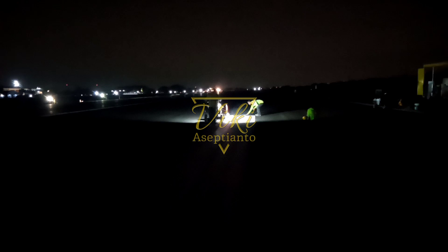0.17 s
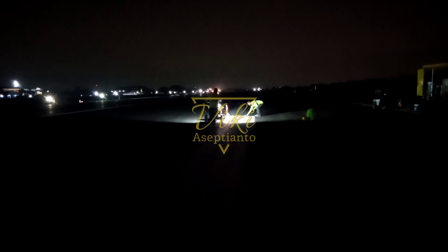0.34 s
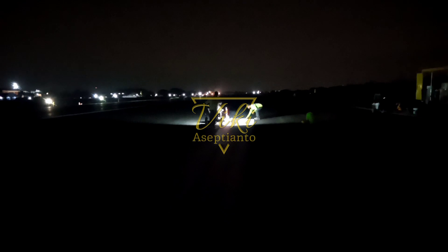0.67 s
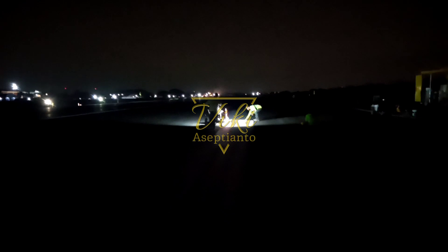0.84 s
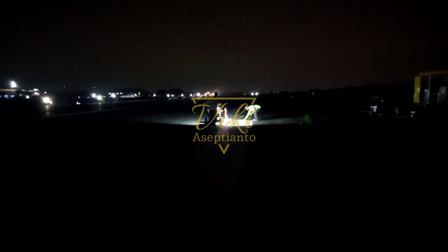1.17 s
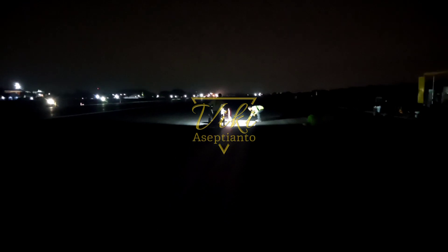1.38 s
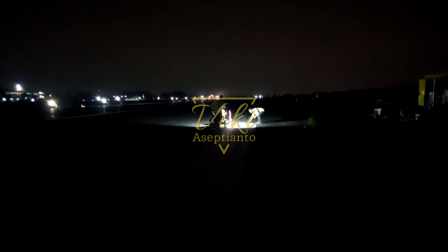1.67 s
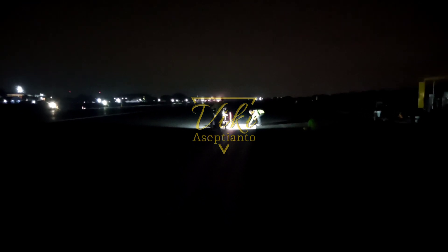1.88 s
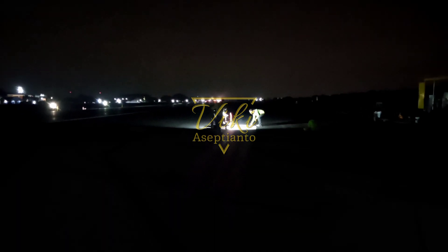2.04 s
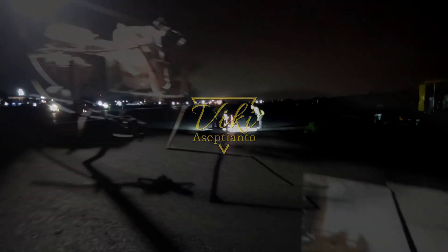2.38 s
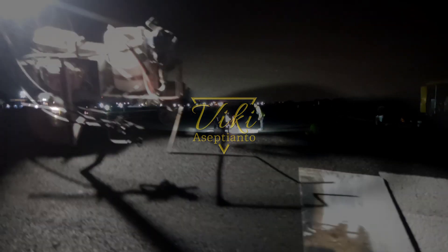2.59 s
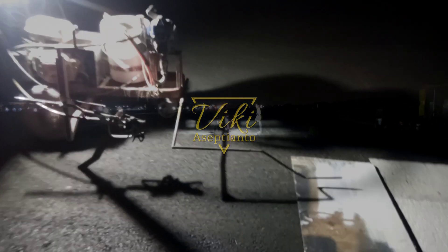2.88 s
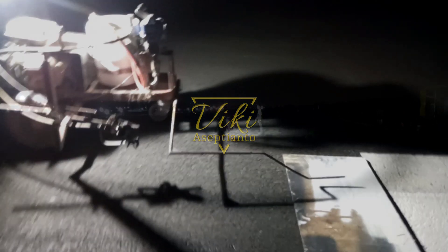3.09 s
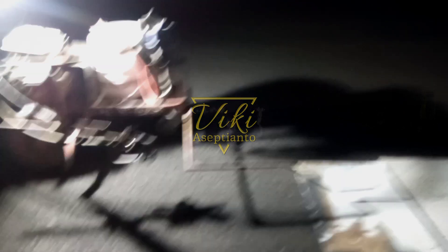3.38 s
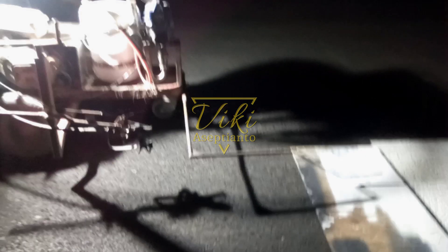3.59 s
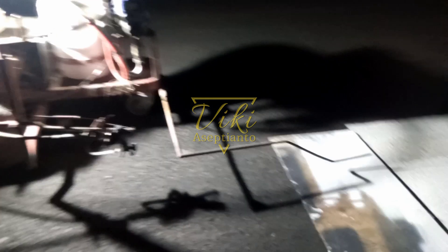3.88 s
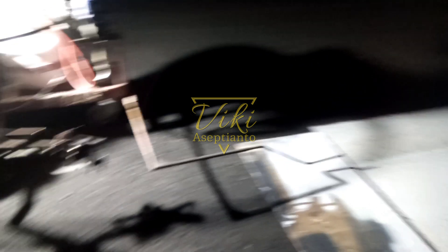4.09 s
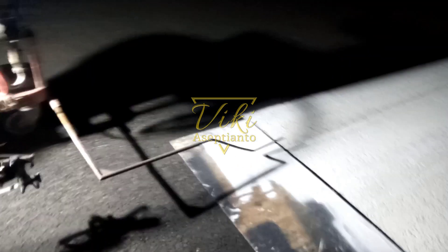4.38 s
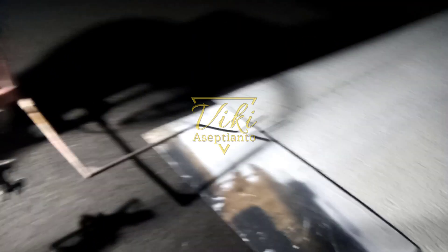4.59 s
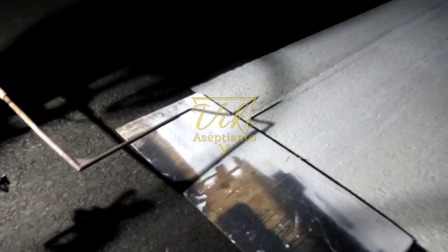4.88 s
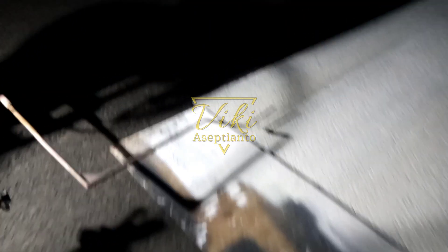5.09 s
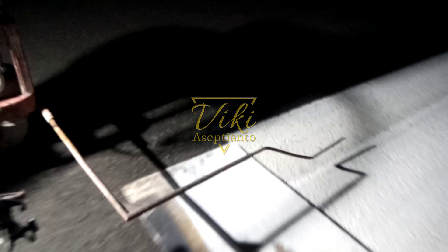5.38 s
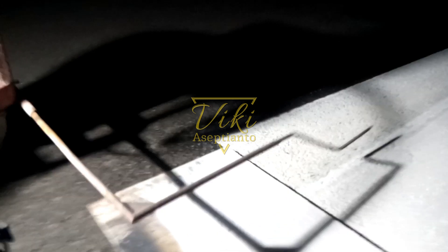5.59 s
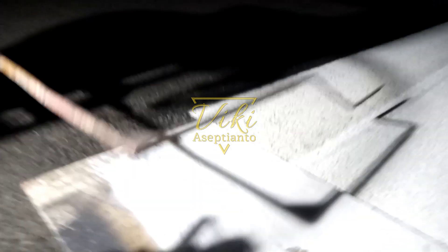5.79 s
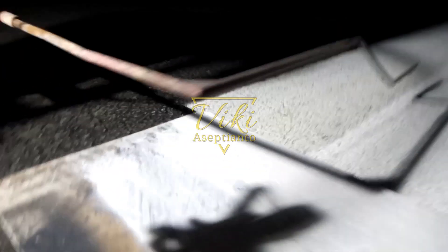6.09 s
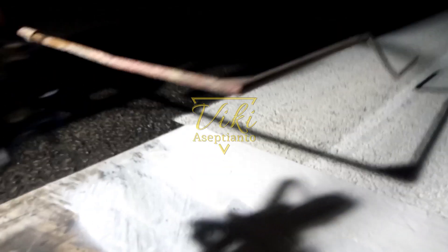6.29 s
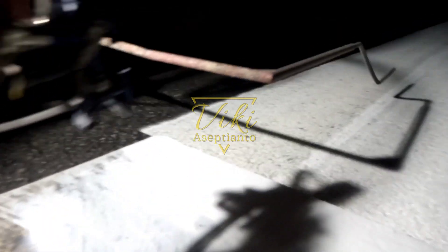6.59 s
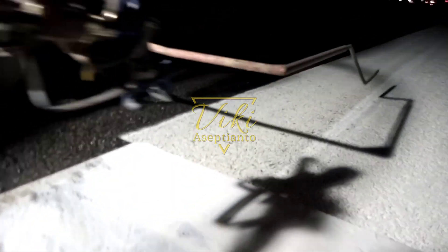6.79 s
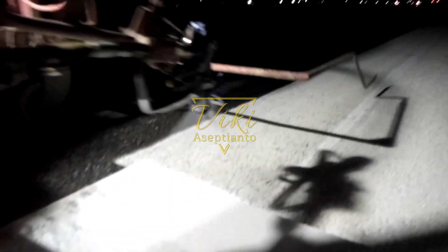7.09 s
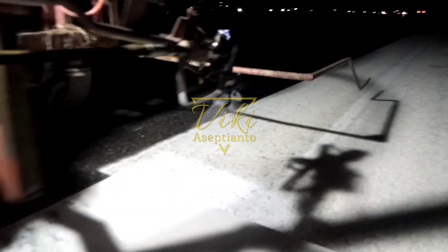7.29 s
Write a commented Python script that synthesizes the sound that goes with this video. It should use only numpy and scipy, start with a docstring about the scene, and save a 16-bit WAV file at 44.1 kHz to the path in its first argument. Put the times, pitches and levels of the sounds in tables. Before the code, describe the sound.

Outdoors on open pavement, a small petrol engine and chugging compressor putter faintly in the distance. At about two and a half seconds the sound crossfades to a close position: a dense buzzing drone, thudding exhaust, knocking casing and strong rush of spray air. Loose steel fittings chatter and ring in bright fits, with quick clacks and thin squeals around six seconds. The handheld microphone ends up right beside the machine.

```python
"""Open pavement: a wheeled road-marking sprayer at work, a distant scene fading into one beside it.
Its one-cylinder petrol engine thuds, hums and knocks as shaped impulses, and its compressor chugs.
Loose steel fittings on the frame chatter and ring in fits: resonances driven by dense tiny impacts.
Air, a very high hiss and the jet on the road are coloured noise, and the treble flutters steadily.
Close by, the asphalt mirrors engine and spray."""
import sys
import numpy as np
from scipy import signal
from scipy.fft import rfft, irfft
from scipy.io import wavfile
from scipy.ndimage import uniform_filter1d, map_coordinates

SR = 44100
rng = np.random.default_rng(int(sys.argv[2]) if len(sys.argv) > 2 else 0)


def unload_audio(sound):
    """Save the sound as a 16-bit wav file, at the path given as the first command line argument."""
    columns = np.transpose(np.atleast_2d(sound))
    # keep every value between -1 and 1, then stretch to whole-number steps
    steps = np.round(np.clip(columns, -1, 1) * 32767)
    wavfile.write(sys.argv[1], SR, steps.astype(np.int16))


N = 328545

# the distant scene fades out while a close scene fades in: time_s, closeness (0-1), far_db, near_db
LISTENER = [(2.05, 0.01, 4.5, -44), (2.3, 0.04, -1, -32), (2.58, 0.02, -3, -25), (2.95, 0.51, -2, -17),
            (3.35, 0.83, -9, -10.5), (3.95, 0.53, -40, -5), (4.16, 0.55, -42, -1)]
# swells and lulls of the engine and the spray: middle_s, half_length_s, change_db, part
SWELLS = [(.06, 0.18, 3, "knock"), (.85, 0.24, -7.5, "knock"), (1.3, 0.32, -2, "air"),
          (1.5, 0.98, 5.5, "mist"), (2.78, 0.13, -1, "air"), (3.12, .12, -2, "air"),
          (4.16, 0.42, 3, "knock"), (4.17, 0.17, 1, "cover"), (4.47, 0.052, 0, "exhaust"),
          (5.57, 0.12, 2, "knock"), (5.75, 0.26, 3.5, "knock"), (5.85, 0.15, -13, "cover"),
          (6.42, 0.054, 3, "exhaust"), (6.77, 0.039, -5.5, "air"), (5.05, 0.74, 11.5, "tailpipe"),
          (5.75, .25, -11, "tailpipe"), (6.55, 0.71, 7, "tailpipe"), (6.6, 0.32, 0, "drone"),
          (7.2, 0.75, -23, "cover"), (7.28, 0.36, 6.5, "knock"), (7.38, 0.16, 10.5, "exhaust"),
          (7.38, 0.15, -2.5, "drone")]


def undb(db):
    """Decibels to gain."""
    return 10 ** (np.asarray(db) / 20)


def curves(table):
    """The columns of a table, joined by straight lines in time and held outside it."""
    s, *columns = np.transpose(table)
    return [np.interp(np.arange(N) / SR, s, c) for c in columns]


def unit(x):
    """Scale to rms 1."""
    return x / np.sqrt(np.mean(x ** 2) + 1e-18)


def noise():
    """White noise."""
    return rng.standard_normal(N)


def wander(rate, count=1024):
    """Drift in straight lines between bounded random points, rate of them a second, at rms 1."""
    points = rng.standard_normal(count)
    path = map_coordinates(points, [np.arange(N) / SR * rate], order=1, mode="mirror")
    return unit(np.tanh(path))


def colour(x, points, size=4096):
    """Minimum-phase filter with the given (Hz, dB) outline, falling steeply outside it."""
    hz, db = np.transpose(points)
    octave = np.log2(np.maximum(np.fft.rfftfreq(size, 1 / SR), 1))
    known = np.log2(hz)
    outside = np.abs(octave - np.clip(octave, known[0], known[-1]))
    # 40 dB an octave beyond the outline, for two octaves
    gain = undb(np.interp(octave, known, db) - 40 * np.minimum(outside, 2))
    # folding the cepstrum forward makes the filter causal
    cepstrum = irfft(np.log(gain))
    cepstrum[1:size // 2] *= 2
    cepstrum[size // 2 + 1:] = 0
    impulse_response = irfft(np.exp(rfft(cepstrum)))
    return unit(signal.oaconvolve(x, impulse_response)[:N])


def ring(x, modes):
    """Drive (Hz, width Hz, dB) resonances, each filtered twice so the valleys between stay dark."""
    out = 0
    for hz, width, db in modes:
        section = np.concatenate(signal.iirpeak(hz, hz / (width * np.sqrt(2)), SR))
        out = out + undb(db) * signal.sosfilt([section, section], x)
    return unit(out)


def strokes(turns, jitter_s, scatter_db, weak_db, count=512):
    """One uneven impulse a turn; every second one is shifted by weak_db."""
    chance = rng.standard_normal((count, 2))
    at = np.flatnonzero(np.diff(np.floor(turns), prepend=-1) > 0)
    late, size = chance[:len(at)].T
    db = scatter_db * np.tanh(size) + weak_db * (np.arange(len(at)) % 2)
    place = np.clip(at + (jitter_s * SR * late).astype(int), 0, N - 1)
    return np.bincount(place, undb(db), N)


def puffs(impulses, decay_s, rise_s=0.00014):
    """The envelope of bursts that swell at each impulse and die away."""
    for s in (rise_s, decay_s):
        impulses = signal.lfilter([1], [1, -np.exp(-1 / (s * SR))], impulses)
    return unit(impulses)


def contacts(envelope, spread_db):
    """Dense tiny impacts of unequal size under an envelope."""
    size_db = spread_db * np.minimum(rng.exponential(size=N), 5)
    return unit(envelope * noise() * undb(size_db))


def crossfade(far, near, close):
    """Blend the distant and the close sound at equal power."""
    close = np.clip(close, 0, 1)
    return np.sqrt(1 - close) * far + np.sqrt(close) * near


def boost(table, part):
    """The gain of one part as each of its fits or swells rises and falls in a bell."""
    t, db = np.arange(N) / SR, np.zeros(N)
    for s, half_length, peak_db, name in table:
        if name == part:
            inside = np.abs(t - s) < half_length
            db[inside] += peak_db * np.cos(np.pi / 2 * (t[inside] - s) / half_length) ** 2
    return undb(db)


def heard(source, turn_db=0):
    """The gain of a source at the microphone: its distant and its close sound, added in power."""
    # by source, before the fades: far_db, near_db, steepness (of its fade-in in the close scene)
    levels = { "exhaust": (-48, -39.5, 0.8), "knock": (-47.5, -36.5, 0.62), "cover": (-82, -37.5, 1.67),
              "drone": (-70, -35.5, 1), "tailpipe": (-72, -54, 0.77), "air": (-47.5, -29, 1.11),
              "mist": (-60, -43, 1.3), "roar": (-95, -32, 1.33), "fittings": (-56, -33, 0.93),
              "plate": (-64.5, -49, 0.87), "tray": (-72, -47, 0.89), "bracket": (-67.5, -38.5, 0.96),
              "strut": (-61.5, -41.5, 1), "hook": (-62.5, -43, 1.5), "guard": (-56.5, -34.5, 1.46),
              "washer": (-66.5, -36.5, 0.91), "pin": (-64.5, -38, 0.96)}
    far_db, near_db, steepness = levels[source]
    _, fade_out_db, fade_in_db = curves(LISTENER)
    far = undb(far_db + fade_out_db)
    near = undb(near_db + steepness * fade_in_db + turn_db)
    return np.hypot(far, near)


def clacks(swell_s):
    """Loose steel slaps the frame: each is a brief crack or chink around the pitch of the spot struck."""
    # hard slaps: start_s, level_db, pitch_hz, filter_width_hz
    slaps = [(.457, -37, 5646, 4000), (.688, -36, 5270, 200), (2.958, -38, 9000, 1000),
             (3.040, -39.5, 8900, 1000), (3.128, -36, 7000, 3000), (3.146, -39, 7000, 3000),
             (3.735, -28, 5900, 2500), (3.848, -27, 7400, 3000), (4.765, -30, 7800, 900),
             (5.155, -28, 5600, 2370), (5.318, -27, 7400, 1200), (5.585, -23, 5650, 500),
             (5.635, -29, 5650, 300), (5.78, -28, 7000, 1200), (6.160, -25, 5550, 600),
             (6.211, -25, 5400, 600), (6.227, -22, 5400, 500), (6.285, -23, 5600, 900),
             (6.302, -20, 6000, 2400), (6.326, -20.5, 5960, 2400), (6.346, -21, 5700, 1200),
             (6.36, -21, 5670, 1000), (6.398, -24, 5650, 1200), (6.420, -23, 6300, 2400),
             (6.469, -27.5, 5400, 1200), (6.492, -32, 5400, 1200), (6.559, -26, 5700, 900),
             (6.589, -23, 7100, 900), (6.654, -22.5, 5900, 1500), (6.676, -26, 7500, 1200),
             (6.693, -25, 6000, 2400), (6.727, -33, 5600, 2400), (6.765, -21, 9000, 1400),
             (6.783, -27, 9150, 1400)]
    out = np.zeros(N)
    t = np.arange(SR // 20) / SR
    for s, db, hz, width_hz in slaps:
        section = np.concatenate(signal.iirpeak(hz, hz / width_hz, SR))
        crack = unit(signal.sosfilt([section, section], rng.standard_normal(len(t))))
        i = int(s * SR)
        out[i:i + len(t)] += undb(db) * t / swell_s * np.exp(1 - t / swell_s) * crack
    return out


def rattle(crank, flutter, close):
    """The fittings' chatter flutters at a steady rate; engine turns ring loose parts, which flutter too."""
    # fits in which a part shakes harder: middle_s, half_length_s, boost_db, part
    fits = [(.08, 0.36, 5, "plate"), (.35, 0.11, 10.5, "plate"), (2.24, 0.08, 7, "plate"),
            (.48, 0.033, 8, "guard"), (.46, 0.046, -2, "fittings"), (.61, 0.054, 2, "fittings"),
            (.74, 0.049, 12.5, "guard"), (.76, 0.12, 11, "washer"), (.99, 0.11, 4.5, "guard"),
            (1.46, 0.079, 6, "guard"), (1.96, 0.88, 4.5, "guard"), (1.99, 0.18, 12, "washer"),
            (2.96, 0.087, 3.5, "fittings"), (3.23, 0.15, 8.5, "pin"), (3.83, 0.043, 0.5, "fittings"),
            (3.87, 0.11, 6, "guard"), (4.13, 0.08, -1, "fittings"), (4.4, 0.51, 13, "washer"),
            (4.74, 0.082, 3, "fittings"), (4.88, 0.4, 9.5, "washer"), (4.93, 0.03, 6, "guard"),
            (5.15, 0.082, 5, "fittings"), (5.14, 0.1, 8, "washer"), (5.28, .16, 6, "washer"),
            (5.33, 0.21, 3, "fittings"), (5.48, .25, 7, "pin"), (5.99, 0.14, 1, "fittings"),
            (6.08, 0.68, 7.5, "bracket"), (5.98, 0.053, 7, "washer"), (6.1, 0.1, 8.5, "washer"),
            (6.17, 0.16, 4.5, "fittings"), (6.15, 0.24, 6.5, "guard"), (6.27, 0.16, 11, "pin"),
            (6.33, 0.051, 3, "fittings"), (6.53, 0.2, 8.5, "pin"), (6.58, 0.096, 14, "tray"),
            (6.65, 0.14, 12.5, "bracket"), (6.67, 0.13, 5.5, "fittings"), (6.89, 0.23, 9, "bracket"),
            (6.85, 0.12, 19, "tray"), (6.84, 0.062, 9.5, "pin"), (6.99, 0.21, 11, "pin"),
            (7.08, 0.25, 10.5, "washer"), (7.2, 0.36, 2, "guard"), (7.24, 0.34, 12.5, "tray"),
            (7.26, 0.27, 4.5, "fittings"), (7.39, 0.057, 8, "guard"), (.04, 0.078, 5.5, "strut"),
            (.99, .08, 8, "strut"), (1.17, 0.051, 7, "strut"), (1.97, 0.13, 6, "strut"),
            (2.76, 0.091, 6, "strut"), (6.86, .1, 8, "strut"), (7.14, .14, 8, "strut"),
            (.36, .2, 1, "hook"), (.72, 0.08, 7, "hook"), (1.37, 0.052, 3, "hook"),
            (5.985, 0.047, 18, "hook"), (6.08, .07, 12, "hook"), (6.17, 0.043, 14, "hook"),
            (1.27, 0.1, 6, "guard")]
    # colour of the steel chatter: pitch_hz, level_db
    steel = [(3500, -34), (4800, 4), (5600, -3), (6600, 6), (7500, 5.5), (8100, 2.5), (8800, 10.5),
             (9400, 4), (9950, 0.5), (10300, -14), (11500, -12), (13000, -39)]
    # modes of the many small fittings, then of each loose part: pitch_hz, width_hz, level_db
    fitting_modes = [(4380, 110, -9), (5540, 78, 9.5), (5730, 130, -8), (6270, 870, -1), (7200, 90, 5),
                     (8030, 54, 11), (8570, 150, 8.5), (8910, 180, -11), (8100, 280, -11), (9550, 1100, 3),
                     (9640, 530, -5)]
    bracket_modes = [(2952, 55, -8), (3220, 32, 0), (3435, 28, -11)]
    guard_modes = [(5232, 50, 0), (5620, 100, -9)]
    washer_modes = [(5720, 90, -13), (6333, 52, 0), (6970, 60, -15), (7885, 45, -14), (8620, 90, -15),
                    (8828, 65, -11)]
    pin_modes = [(9910, 79, 10), (11000, 90, -27), (11600, 90, -17)]
    plate_modes = [(2119, 36, 5.5), (2270, 77, -5)]
    tray_modes = [(1011, 51, 0)]
    strut_modes = [(3780, 70, -10), (3907, 30, 0)]
    hook_modes = [(7900, 70, -10), (8105, 55, 0)]
    # the last number is how deeply the flutter cuts the ring
    parts = [
        ("bracket", bracket_modes, 0.46), ("guard", guard_modes, 2.1),
        ("washer", washer_modes, 1.9), ("pin", pin_modes, 2.5),
        ("plate", plate_modes, 0.65), ("tray", tray_modes, 1.7),
        ("strut", strut_modes, .4), ("hook", hook_modes, 1.5)]
    # loose parts never rattle evenly: how fast and how far their strength wanders
    wander_per_s, chatter_wander_db, ring_wander_db = 22, 2.5, 2.5

    beat = strokes(flutter, jitter_s=0.00061, scatter_db=5.5, weak_db=-0.5)
    offbeat = strokes(flutter + 0.378, jitter_s=0.00118, scatter_db=3.5, weak_db=0.0)
    pulses = puffs(beat + undb(2.0) * offbeat, decay_s=0.0058, rise_s=0.0001)
    # from afar the flutter is shallower
    pulses = unit(pulses + 0.34 * (1 - close))

    ticks = contacts(pulses, spread_db=3)
    ringing = ring(contacts(pulses, spread_db=2.0), fitting_modes)
    chatter = colour(ticks, steel) + undb(-3.5) * ringing
    # the chatter wanders half as far from afar
    unrest = undb(chatter_wander_db * (1 + close) / 2 * wander(wander_per_s))
    out = heard("fittings") * boost(fits, "fittings") * unrest * chatter

    for part, modes, flutter_depth in parts:
        throws = strokes(crank, jitter_s=0.0022, scatter_db=4.5, weak_db=-4.5)
        own = puffs(throws, decay_s=0.0026, rise_s=0.00051)
        tone = ring(contacts(own + 1.8 * pulses, spread_db=-2.0), modes)
        # a part has only so much play, which limits its swing; the ring dips between pulses
        swing = np.abs(uniform_filter1d(tone ** 2, size=300))
        tone = unit(tone * (1 + flutter_depth * pulses) / np.sqrt(1 + 0.74 * swing))
        unrest = undb(ring_wander_db * wander(wander_per_s))
        out = out + heard(part) * boost(fits, part) * unrest * tone
    return out


def whistle(crank, width_hz):
    """Thin scraping squeals of narrow-band noise swell, stutter with the engine and slide down."""
    # squeals: start_s, length_s, first_pitch_hz, last_pitch_hz, level_db (before the stutter)
    squeals = [(5.26, .22, 4450, 4380, -38), (5.65, .07, 4350, 4250, -32), (5.75, .06, 4500, 4400, -33),
               (5.8, .1, 3760, 3560, -30.5), (5.91, .07, 3760, 3700, -33), (6.33, .14, 4600, 3850, -33)]
    out = 0
    for start, length, first_hz, last_hz, db in squeals:
        progress = np.clip((np.arange(N) / SR - start) / length, 0, 1)
        phase = 2 * np.pi * np.cumsum(first_hz + (last_hz - first_hz) * progress) / SR
        lowpass = signal.butter(2, width_hz / 2, fs=SR, output="sos")
        band = signal.sosfilt(lowpass, noise() + 1j * noise())
        squeal = unit(np.real(band * np.exp(1j * phase)))
        out = out + undb(db) * np.sin(np.pi * progress) * squeal
    turns = strokes(crank, jitter_s=.002, scatter_db=3, weak_db=0)
    return puffs(turns, decay_s=.008, rise_s=.002) * out


def air(crank, close):
    """Air rushes from the gun, throbbing a little with the engine, whose shaking also rings the frame."""
    # colour of the rush from afar and close by: pitch_hz, level_db
    rush_far = [(800, 10), (1100, -4), (1400, 3), (1560, -4), (1690, -5), (1810, -15), (2000, -4),
                (2250, 2), (2400, -4), (2500, -15), (2650, 2), (2850, 2.5), (4500, 5), (7000, -5.5),
                (9700, -21), (11000, -7.5)]
    rush_near = [(700, 1.5), (1050, 5.5), (1450, 1.5), (1700, 5.5), (2300, 2.5), (2700, 6.5), (3050, 5.5),
                 (3700, 4.5), (4400, 1), (4900, -4.5), (5600, 4), (7000, 2), (9700, -32), (11000, -33)]
    # modes of the frame from afar and close by: pitch_hz, width_hz, level_db
    frame_far = [(2135, 30, -6), (2680, 90, -8), (3200, 90, -6), (4420, 190, -2)]
    frame_near = [(885, 19, -7), (1005, 30, -1), (1186, 30, 0), (3740, 120, 3.5), (4350, 180, -2)]
    turns = strokes(crank, jitter_s=0.0004, scatter_db=4.5, weak_db=-2.5)
    shake = puffs(turns, decay_s=0.0081, rise_s=0.0035)
    rush = unit((1 + (0.15 + 0.28 * close) * shake) * noise())
    buzz = contacts(shake + .5, spread_db=3.5)
    far = undb(-4.0) * colour(rush, rush_far) + undb(-14.5) * ring(buzz, frame_far)
    near = undb(1.2) * colour(rush, rush_near) + undb(-4.5) * ring(buzz, frame_near)
    return crossfade(far, near, close)


def spray(crank, flutter, close):
    """Air rushes from the gun, a thin, very high hiss flutters, the jet roars on the road, squeals join."""
    # level changes of the close sound: time_s, air_db, hiss_db, roar_db
    gun = [(4.2, 0, 4, -7), (4.52, -5, 2, 0.5), (5.1, -2, 6, 2), (5.75, 2.5, 7, 1), (6.25, 2, 8, -3),
           (6.65, 2.5, 6, 1.5), (6.85, 0.5, 9, -1.5), (7.1, 0.5, 17.5, -4), (7.45, 3, 16.5, -2)]
    # colour of the high hiss: pitch_hz, level_db
    hiss_colour = [(7000, 7), (10300, 5), (11500, -2), (12500, -8), (13700, -1), (14600, 1), (15400, 6),
                   (16000, 10.5)]
    # resonances of the jet's roar: pitch_hz, width_hz, level_db
    roar_modes = [(1484, 213, 2.5), (1924, 56, 4.5), (2047, 158, 6.5), (2380, 260, 3)]
    flutter_depth = .35
    air_db, hiss_db, roar_db = curves(gun)

    # the hiss flutters at a steady rate; the tables list it as "mist"
    beats = strokes(flutter, jitter_s=.0016, scatter_db=1, weak_db=0)
    pulses = puffs(beats, decay_s=.005, rise_s=.003)
    high_noise = colour((1 + flutter_depth * pulses) * noise(), hiss_colour)
    hiss = heard("mist", hiss_db) * boost(SWELLS, "mist") * high_noise

    turns = strokes(crank, jitter_s=.0003, scatter_db=2, weak_db=-2)
    spurts = puffs(turns, decay_s=.006, rise_s=.001)
    roar = heard("roar", roar_db) * ring(contacts(spurts + .6, spread_db=3), roar_modes)

    rush = heard("air", air_db) * boost(SWELLS, "air") * air(crank, close)
    sputter = undb(1.0 * wander(14))
    return sputter * (rush + roar + hiss) + whistle(crank, width_hz=136)


def drone(crank, lines):
    """A hum on multiples of the crank speed, each line wavering a little in level and phase."""
    out = 0
    for multiple, db in lines:
        level = undb(db + 1.5 * wander(5))
        drift = .012 * multiple ** .8 * wander(2.5)  # in cycles
        out = out + level * np.sin(2 * np.pi * (multiple * crank + rng.random() + drift))
    return unit(out)


def cover(crank):
    """The engine's sheet-metal cover buzzes on every turn: resonances driven by bursts of noise."""
    # modes of the cover: pitch_hz, width_hz, level_db
    cover_modes = [(1186, 69, -7), (1319, 33, -2), (1380, 22, -1.5)]
    turns = strokes(crank, jitter_s=0.0003, scatter_db=2.5, weak_db=-1.0)
    shake = puffs(turns, decay_s=0.0063)
    return ring((shake + 0.23) * noise(), cover_modes)


def chugs(close, far_hz, near_hz, swell_s, thud_hz, thud_db, thud_s):
    """A valve shuts harder and the compressor's body barks, brighter close by; from afar a thud joins."""
    # the hardest knocks of the compressor: start_s, level_db
    hard_knocks = [(.026, -29.5), (.047, -29), (.082, -35), (.219, -36), (.269, -34), (.458, -32.5),
                   (.604, -33), (.625, -34), (.704, -34), (.765, -34), (.798, -35), (.857, -36),
                   (.891, -35), (.908, -34), (.950, -34.5), (1.000, -36), (1.037, -32), (1.067, -35),
                   (1.104, -36), (1.141, -31), (1.203, -35), (1.237, -32.5), (1.273, -41), (1.294, -35),
                   (1.336, -31), (1.392, -36), (1.470, -32.5), (1.574, -32), (1.638, -37), (1.767, -31),
                   (1.950, -36), (1.973, -41), (2.060, -32.5), (2.198, -36), (2.354, -36), (2.541, -43),
                   (2.739, -42), (2.776, -40.5), (2.905, -40), (3.051, -39), (3.191, -33.5), (3.257, -34),
                   (3.277, -32), (3.325, -30), (3.346, -36), (3.421, -30), (3.474, -35), (3.570, -36),
                   (3.756, -31), (3.850, -30), (4.135, -28), (4.173, -26), (5.565, -24), (5.597, -25),
                   (5.637, -24), (6.872, -19)]
    out = np.zeros(N)
    t = np.arange(SR // 20) / SR

    def burst(hz, peak_s):
        """A tone that swells to its peak and dies away."""
        return t / peak_s * np.exp(1 - t / peak_s) * np.sin(2 * np.pi * (hz * t + rng.random()))

    for s, db in hard_knocks:
        i = max(int(s * SR), 0)
        hz = (far_hz + (near_hz - far_hz) * close[i]) * (1 + .025 * rng.standard_normal())
        thud = undb(thud_db) * max(1 - 2 * close[i], 0) * burst(thud_hz, thud_s)
        out[i:i + len(t)] += undb(db) * (burst(hz, swell_s) + thud)
    return out


def knock(crank, pump, close):
    """The piston knocks in its casing; the compressor's chug carries furthest."""
    # colour from afar and close by: pitch_hz, level_db
    casing_far = [(280, -22.5), (480, -18), (611, 6.5), (645, 4.5), (789, 5), (819, -7), (910, 2.5),
                  (934, -5), (1150, -51), (1500, -29), (2530, -120)]
    casing_near = [(290, -33.5), (480, -19), (528, -20), (570, 2), (653, 0), (876, 14.5), (1080, -0.5),
                   (1200, -45), (1560, -54), (2640, -120)]
    piston = strokes(crank, jitter_s=.00012, scatter_db=1.5, weak_db=-2)
    # the blows are harder under the compressor's load
    piston = piston * (1 + .55 * np.cos(2 * np.pi * pump))
    valve = strokes(pump, jitter_s=.0008, scatter_db=2, weak_db=-1)
    # from afar a steady floor fills in the clatter
    piston_shake = puffs(piston, decay_s=0.005, rise_s=0.002) + .9 - .9 * close
    clatter = contacts(piston_shake, spread_db=1.5)
    chug = contacts(puffs(valve, decay_s=.009, rise_s=.002) + .3, spread_db=1.5)
    far = chug + undb(-8) * unit(valve) + undb(2) * unit(piston) + undb(6) * clatter
    near = clatter + undb(-2) * unit(piston) + undb(-8.5) * chug
    far = undb(-1.25) * colour(far, casing_far)
    near = undb(-1.0) * colour(near, casing_near)
    return crossfade(far, near, close)


def exhaust(crank, pump, close):
    """Engine pulses, every second one weaker, and the compressor's gulps thud in the silencer."""
    # colour from afar and close by: pitch_hz, level_db
    silencer_far = [(25, -24), (59, -19), (86, -10), (152, -6), (192, 0), (230, -5), (283, -11), (325, -7),
                    (370, -10), (430, -12.5), (490, -19), (680, -19), (1140, -120)]
    silencer_near = [(25, -19), (32, -16), (50, -6), (62, -7), (85, -1.5), (110, -2), (135, 1), (168, 3.5),
                     (205, 0), (245, -2), (295, -2), (370, -2.5), (470, -1.5), (560, -8)]
    firings = strokes(crank, jitter_s=0.00013, scatter_db=0.5, weak_db=-8.0)
    gulps = strokes(pump, jitter_s=0.0011, scatter_db=-0.5, weak_db=-2.0)
    gas = puffs(firings + gulps, decay_s=0.084) * noise()
    push = unit(unit(firings) + undb(-10.5) * unit(gulps) + undb(4.5) * gas)
    return crossfade(colour(push, silencer_far), colour(push, silencer_near), close)


def engine(crank, pump, close):
    """Silencer, drone, tailpipe, casing, cover and compressor together."""
    # the engine's drone: crank_multiple, level_db
    drone_lines = [(2, -12), (2.5, -12), (3, 0), (3.5, -12), (4.5, -10), (5, -11), (5.5, -10), (6, -11),
                   (11, -8), (12, -9), (13, -5), (14.5, -6), (15.5, -7), (16.5, 0), (17, -3), (18, -1.5),
                   (19, -2), (22.5, -5), (25, 1.5), (26, -4)]
    # the hum of the tailpipe, heard when it points at the listener: crank_multiple, level_db
    tailpipe_lines = [(7.5, -12), (8, 0), (8.5, -11), (9, -6)]
    # the silencer reaches its close colour sooner than the rest
    silencer = boost(SWELLS, "exhaust") * heard("exhaust") * exhaust(crank, pump, 2 * close)
    hum = heard("drone") * boost(SWELLS, "drone") * drone(crank, drone_lines)
    tailpipe = heard("tailpipe") * boost(SWELLS, "tailpipe") * drone(crank, tailpipe_lines)
    casing = boost(SWELLS, "knock") * heard("knock") * knock(crank, pump, close)
    sheet = boost(SWELLS, "cover") * heard("cover") * cover(crank)
    compressor = chugs(close, far_hz=690, near_hz=894, swell_s=0.0026,
                       thud_hz=195, thud_db=-4.5, thud_s=.004)
    return silencer + hum + tailpipe + casing + sheet + compressor


def road(x, low_hz, dull_hz):
    """Close by, a thinner, duller copy bounces off the asphalt and sweeps hollows through the sound."""
    # the bounce, as the listener's height and distance allow: time_s, lag_ms, strength (0-1)
    bounce = [(2.3, 1.1, 0), (2.8, 1.2, 0.25), (3.05, 1.32, .35), (3.4, 1.46, 0.4), (4.0, 1.5, 0.65),
              (4.3, 1.45, 0.03), (5.35, 1.19, 0), (5.7, 1.15, 0.27), (6.3, 0.9, 0.2), (7.1, 0.91, 0.22)]
    lag_ms, strength = curves(bounce)
    mirrored = map_coordinates(x, [np.arange(N) - lag_ms * SR / 1000], order=1)
    bandpass = signal.butter(1, [low_hz, dull_hz], "bandpass", fs=SR, output="sos")
    dulled = signal.sosfilt(bandpass, mirrored)
    return (x + strength * dulled) / np.hypot(1, strength)


def scene():
    """Engine and spray over the mirroring road, with the rattle and the slaps of loose steel."""
    # crankshaft speed: time_s, turns_hz
    crank_speed = [(.3, 51.85), (.6, 51.4), (1, 51.95), (1.9, 51.7), (2.4, 51.1), (2.8, 53.45),
                   (3.1, 53.15), (4.2, 53), (4.57, 52.65), (4.9, 52.9), (5.17, 52.7), (5.6, 53.25),
                   (6.2, 53.3), (6.8, 53.8), (7.3, 53.6)]
    compressor_hz, flutter_hz = 20.8, 43.1  # the treble flutters at a steady rate
    crank_hz, = curves(crank_speed)
    close = np.clip(curves(LISTENER)[0], 0, 1)
    t = np.arange(N) / SR
    # running counts of cycles
    crank = np.cumsum(crank_hz) / SR
    pump = compressor_hz * t
    flutter = flutter_hz * t
    machine = engine(crank, pump, close) + spray(crank, flutter, close)
    mirrored = road(machine, low_hz=200, dull_hz=4800)
    return (mirrored + rattle(crank, flutter, close) + clacks(swell_s=0.0028))[None]


def record(dry):
    """The microphone cuts the very top, steeply above 15550 Hz."""
    lowpass = signal.ellip(10, .2, 80, 15550, fs=SR, output="sos")
    return signal.sosfilt(lowpass, dry)


dry = scene()
out = record(dry)
unload_audio(out)
```